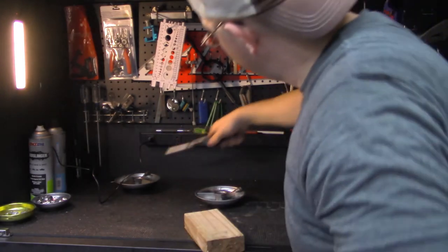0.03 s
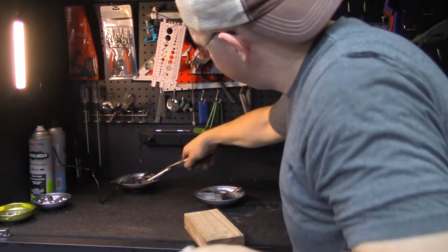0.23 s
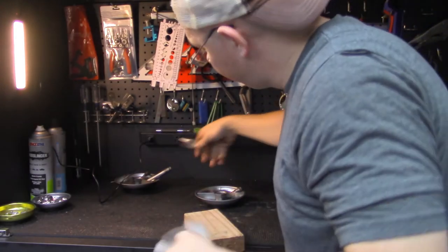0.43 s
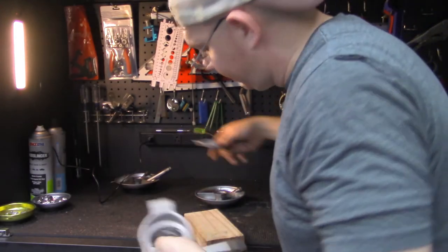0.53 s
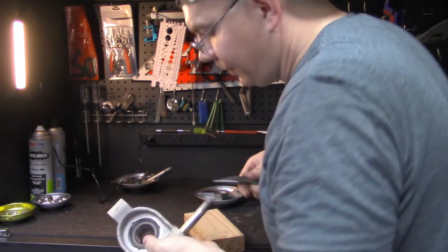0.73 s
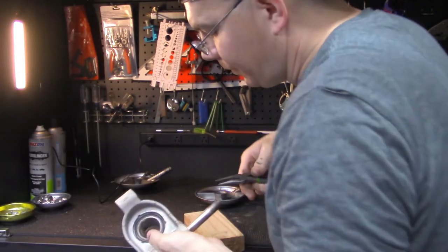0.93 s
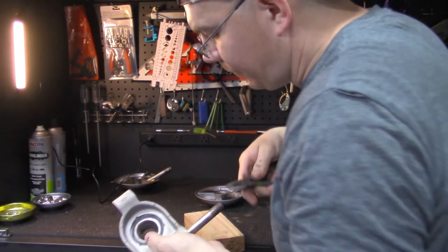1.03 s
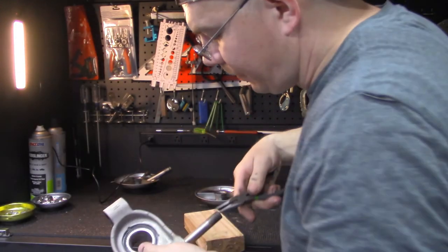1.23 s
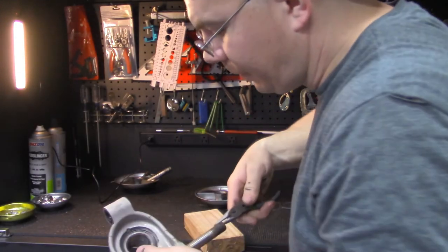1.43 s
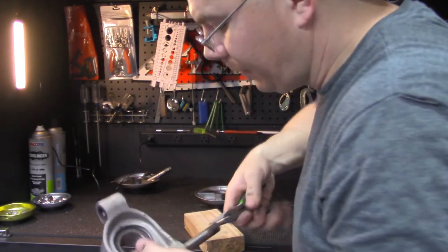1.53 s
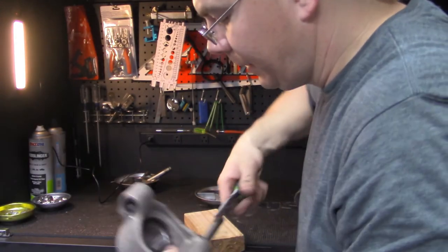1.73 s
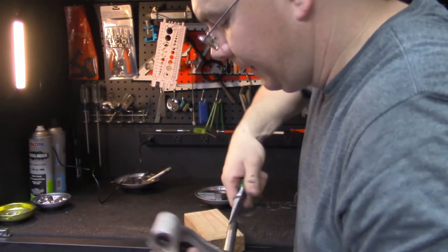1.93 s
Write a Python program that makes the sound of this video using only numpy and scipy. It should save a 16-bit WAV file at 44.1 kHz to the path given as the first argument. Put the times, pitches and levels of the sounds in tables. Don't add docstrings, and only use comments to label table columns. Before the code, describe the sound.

A steel tool drops into a metal dish with a loud clank, bounces and rattles the small parts, then a click, a soft thud and light tool clicks and scrapes, close stereo in a small humming garage.

```python
import sys
import numpy as np
from scipy import signal
from scipy.fft import rfft, irfft
from scipy.io import wavfile
from scipy.ndimage import uniform_filter1d

SR = 44100
rng = np.random.default_rng(int(sys.argv[2]) if len(sys.argv) > 2 else 0)


def digitize_waveform(pressure):
    field = np.atleast_2d(pressure).T
    bounded = np.clip(field, -1, 1)
    quanta = np.round(bounded * 32767).astype(np.int16)
    wavfile.write(sys.argv[1], SR, quanta)


def volts(x):
    e = np.asarray(x, float) / 20
    return 10 ** e


N = 88200
T = np.arange(N) / SR
HZ = np.fft.rfftfreq(N, 1 / SR) + 1

# frequency in Hz, level in dB.
AIR_SPECTRUM = [(15, -33.5), (25, 3), (134, -8.5), (301, -14), (775, -14), (1520, -25), (8000, -37.5),
                (16000, -41.5)]
# frequency in Hz, correlation from -1 to 1.
AIR_CORRELATION = [(60, 0.9), (130, 0.18), (290, 0.0087), (640, -0.29), (1410, 0.18), (3100, 0.55),
                   (6820, 0.24), (15000, -0.6)]
# time in seconds, level in dB.
RUMBLE_LEVEL = [(0.0, -51.5), (0.31, -40), (0.52, -46.5), (0.75, -45), (0.82, -35.5), (1.14, -42.5),
                (1.25, -42.5), (1.27, -50), (1.7, -51), (1.72, -55), (1.93, -44), (2.0, -52.5)]
# time in seconds, level in dB.
RUSTLE_LEVEL = [
    (0, -70),
    (.5, -52),
    (.8, -52),
    (1.2, -55),
    (1.55, -51.5),
    (1.7, -50),
    (2.0, -60),
]
# frequency in Hz, level in dB.
CLOTH_SPECTRUM = [(150, 17), (500, -39), (1200, 1.5), (2500, -7), (5000, -4), (9000, -9.5), (15000, -21.5)]
# start in seconds, length in seconds, level in dB, centre frequency in Hz.
SLIDES = [(1.322, .09, -46, 2400), (1.335, .075, -49, 920), (1.325, .07, -47, 6500), (1.59, .1, -54, 4500),
          (1.61, .08, -55, 7000), (1.62, .45, -58, 1500), (1.8, .25, -60, 750), (.7, .65, -66, 4600),
          (.85, .45, -63, 1150), (.243, .06, -27, 1250), (.245, .11, -27, 630), (.27, .15, -40, 215),
          (.52, .05, -47, 2200), (.52, .06, -45, 5200), (1.93, .07, -62, 4800)]
# start in seconds, level in dB, low mode in Hz, high mode in Hz,
# low mode against high mode in dB.
CONTACTS = [(.5203, -14, 3000, 4900, -3), (.5209, -14, 3900, 6900, -1), (.5206, -21, 2100, 5700, 0),
            (.5234, -22, 4900, 5900, 0), (.5290, -25, 3000, 5500, -4), (.5330, -26, 5000, 6200, 0),
            (.5430, -29, 4700, 5200, 0), (1.3228, -36, 2340, 6000, 5), (1.3275, -21, 2720, 6900, -1),
            (1.3360, -21, 2400, 6830, -1), (1.3430, -31, 2600, 7000, 3), (1.3510, -31, 2600, 6640, 2),
            (1.3597, -17, 4900, 6900, -3), (1.3600, -27, 2700, 5800, 2), (1.3660, -26, 2960, 7000, 0),
            (1.3772, -31, 2824, 7000, 6), (1.3864, -15, 2130, 5530, -4), (1.3915, -30, 2200, 5370, 4),
            (1.4697, -12, 4194, 6050, -8), (1.4760, -24, 4500, 5600, -2), (1.4700, -30, 2240, 9500, 3),
            (1.4943, -27, 2330, 5400, 0), (1.5010, -34, 4410, 5620, 0), (1.5808, -24, 4300, 6350, 0),
            (1.5870, -35, 3900, 5600, 0)]
# frequency in Hz, level in dB.
TICK_SPECTRUM = [(500, -38.5), (1200, -20.5), (2000, -3.5), (4000, -2.5), (6500, 5.5), (8000, -13),
                 (11000, -18), (16000, -23.5)]
# start in seconds, level in dB, crack in dB, dish ring in dB.
BLOWS_ON_DISH = [
    (.2305, 0.5, -1, -13),
    (.2330, -5.5, 4.5, -13),
    (.3266, -8.5, 1, 6),
    (.3340, -20, 1, -7),
    (.3385, -18, 8, 1),
]
# frequency in Hz, level in dB, T60 in seconds.
DISH_MODES = [(689, -10, .35), (650, -9, .3), (707, -9, .3), (1160, -14, .45), (1622, -11, .5),
              (1325, -11, .25), (3280, -5, .3), (5120, -11, .3), (5922, -10, .25), (6200, -9, .25),
              (7014, -13, .25), (7500, -11, .4), (8430, -15, .25), (242, -10, .25)]
# frequency in Hz, level in dB, T60 in seconds.
BLADE_MODES = [(2169, 5, 0.16), (2290, -4, 0.16), (5985, 3.5, 0.049), (6050, -11, 0.036), (6350, -3, 0.017),
               (6940, 0.5, 0.075), (5220, -11.5, 0.065), (1175, -5.5, 0.083), (1354, -9.5, 0.071),
               (7350, 0, 0.055), (8860, -1, 0.052), (3800, -5, 0.046)]
# frequency in Hz, level in dB.
CRACK_SPECTRUM = [(100, -54), (700, -18), (1200, -13), (2200, -8), (4000, -1.5), (6500, 2.5), (9000, -1),
                  (16000, -31.5)]
# frequency in Hz, level in dB.
PARTS_SPECTRUM = [(100, -29), (240, -4), (500, -22), (650, -19.5), (959, -9), (1300, 0), (1840, -9),
                  (7500, -7.5), (10600, -19)]
# time in seconds, level in dB.
SHAKE_LEVEL = [
    (.232, -27.5),
    (.25, -21),
    (.29, -19),
    (.322, -25),
    (.34, -29),
    (.37, -29),
    (.42, -47),
    (.5, -73),
]
# frequency in Hz, level in dB, T60 in seconds.
RIM_MODES = [(4929, 0, .7), (4912, -7, .6), (4893, -9, .6), (4962, -8, .3), (4832, -13, .6), (3280, -8, .3),
             (1622, -9, .45), (665, -7, .45), (615, -9, .25)]
# start in seconds, level in dB.
RIM_STRIKES = [
    (.2305, -44),
    (.290, -39),
    (.3375, -37),
    (.5205, -53),
]
# frequency in Hz, level in dB, T60 in seconds.
FLAT_MODES = [(2191, 0, .08), (2141, -6, .08), (3830, -3, .05), (4990, -3, .04), (5060, -5, .05),
              (6160, -3, .05), (6360, -4, .04), (7300, -7, .03), (8790, -7, .04), (1320, -8, .06)]
# start in seconds, level in dB.
FLAT_LANDINGS = [
    (.3266, -26),
    (.3284, -24),
    (.3340, -27),
    (.3380, -24),
]
# frequency in Hz, level difference in dB.
STEEL_LEFT_DB = [(60, 3.5), (110, 3.5), (200, 7.8), (380, 5.8), (700, 8.4), (1290, 10.7), (2380, 11),
                 (4400, 4.4), (8120, 4.8), (15000, 0.5)]
# frequency in Hz, phase in radians.
STEEL_LEFT_RAD = [(60, .2), (300, 1.0), (1200, .6), (5500, .6), (8000, -1.4), (11000, -3.0), (16000, -3.3)]
# frequency in Hz, level difference in dB.
AIR_LEFT_MINUS_RIGHT = [(60, 4.4), (110, 3.8), (200, 1.94), (380, 5.9), (700, 27), (1290, 4.4), (2380, 6.2),
                        (4400, 4.0), (8120, 2.0), (15000, 1.5)]


def across(table):
    hz, value = np.array(table).T
    return np.interp(np.log(HZ), np.log(hz), value)


def along(table):
    return volts(np.interp(T, *np.array(table).T))


def unit(x):
    return x / np.sqrt(np.mean(x ** 2))


def colour(x, table):
    cepstrum = irfft(np.log(volts(across(table))), N)
    cepstrum[1:N // 2] *= 2
    cepstrum[N // 2 + 1:] = 0
    return irfft(rfft(x) * np.exp(rfft(cepstrum)), N)


def cut(x, hz, kind, order=4):
    return signal.sosfilt(signal.butter(order, hz, kind, fs=SR, output="sos"), x)


def ring(x, modes):
    out = 0
    for hz, db, t60 in modes:
        decay = np.log(1000) / max(t60, .002)
        pole = np.exp((2j * np.pi * hz - decay) / SR)
        out = out + volts(db) * signal.lfilter([1], [1, -pole], x).imag
    return out


def at(s, db=0):
    x = np.zeros(N)
    x[int(s * SR)] = volts(db)
    return x


def fade(s, t60):
    return (T >= s) * volts(-60 * np.clip(T - s, 0, None) / t60)


def walk(rate):
    k = int(SR / rate)
    steps = np.repeat(rng.standard_normal(N // k + 1), k)
    return unit(uniform_filter1d(uniform_filter1d(steps, k), k)[:N])


def grains(rate, spread_db):
    happens = rng.random(N) < rate / SR
    size = volts(spread_db * np.minimum(rng.exponential(size=N), 4))
    return unit(happens * size * rng.choice([-1, 1], N))


def wide(table):
    like = np.clip(across(AIR_CORRELATION), -.98, .98)
    noise = rfft(rng.standard_normal((2, N))) * volts(across(table))
    mid, side = noise * np.sqrt([1 + like, 1 - like])
    return unit(irfft(np.array([mid + side, mid - side]), N))


def garage_air():
    return volts(-46.5 + 0.23 * walk(3.35)) * wide(AIR_SPECTRUM)


def sleeve_rustle():
    return along(RUSTLE_LEVEL) * volts(1.2 * walk(8.2)) * wide(CLOTH_SPECTRUM)


def bench_rumble():
    centre_hz, width_hz = 53.4, 48
    hump = [(15, -20), (centre_hz - width_hz / 3, 0), (centre_hz + width_hz, -7), (260, -30), (600, -70)]
    return along(RUMBLE_LEVEL) * wide(hump)


def casting_thud():
    hz, t60_s = 231.4, 0.11
    force = uniform_filter1d(at(.785, -40.5), size=60)
    return ring(force, [(hz, 0, t60_s), (0.85 * hz, 0, t60_s)])


def room(x):
    gap_s, t60_low_s, t60_high_s = 0.001, 0.34, 0.29
    noise = rng.standard_normal((2, N))
    low = cut(noise, 3000, "low", order=2 - 1)
    tail = low * fade(gap_s, t60_low_s) + (noise - low) * fade(gap_s, t60_high_s)
    tail = tail / np.sqrt(np.sum(tail ** 2) / 2)
    return volts(-6.5) * signal.fftconvolve(x[None], tail, axes=1)[:, :N]


def scrapes():
    out = 0
    for s, length, db, hz in SLIDES:
        progress = np.clip((T - s) / length, 0, 1)
        pressure = np.sin(np.pi * progress ** .6) ** .7
        rub = ring(grains(9000, 2.5), [(hz, 0, 18 / hz), (hz * 1.13, -2, 18 / hz)])
        out = out + volts(db + 1) * pressure * unit(rub)
    return out


def clicks():
    ring_t60_s, spread = .0055, .1
    tick_t60_s, chatter_t60_s = 0.0033, 0.05
    rings, ticks = 0, 0
    for s, db, low_hz, high_hz, low_db in CONTACTS:
        low_shift, high_shift = 1 + spread * rng.standard_normal(2)
        modes = [(low_hz, low_db, 2.2 * ring_t60_s), (low_hz * low_shift, low_db - 2.5, ring_t60_s),
                 (high_hz, 0, ring_t60_s), (high_hz * high_shift, -3, ring_t60_s)]
        rings = rings + ring(uniform_filter1d(at(s, db - 8.5), size=3), modes)
        ticks = ticks + volts(db - 13) * fade(s, tick_t60_s)
        ticks = ticks + volts(db - 23.5) * fade(s, chatter_t60_s)
    return rings + ticks * unit(colour(rng.standard_normal(N), TICK_SPECTRUM))


def shaken_parts():
    shake = grains(4000, 2.8)
    start_s, end_s = SHAKE_LEVEL[0][0], SHAKE_LEVEL[-1][0]
    held = along(SHAKE_LEVEL) * (T > start_s) * (T < end_s)
    out = held * unit(colour(shake, PARTS_SPECTRUM))
    for modes, db in [(DISH_MODES, -5.5), (BLADE_MODES, -10)]:
        steady = np.std(ring(shake, modes))
        out = out + volts(db) * ring(shake * held, modes) / steady
    return out


def tool_drop():
    out, hiss = 0, unit(colour(rng.standard_normal(N), CRACK_SPECTRUM))
    for s, db, crack_db, dish_db in BLOWS_ON_DISH:
        out = out + ring(at(s, db + dish_db - 34.5), DISH_MODES)
        out = out + ring(at(s, db - 19.5), BLADE_MODES)
        out = out + volts(db + crack_db - 6.5) * hiss * fade(s, 0.031)
    out = out + ring(sum(at(*hit) for hit in RIM_STRIKES), RIM_MODES)
    return out + ring(sum(at(*hit) for hit in FLAT_LANDINGS), FLAT_MODES)


def microphones(x, table, rad=0):
    half = volts(across(table) / 2) * np.exp(.5j * rad)
    power = np.abs(half) ** 2 + 1 / np.abs(half) ** 2
    return irfft(rfft(x) * np.array([half, 1 / half]) / np.sqrt(power) * 1.566, N)


def scene():
    background = garage_air() + sleeve_rustle() + bench_rumble() + casting_thud()
    dish = cut(tool_drop() + shaken_parts(), 384, "high", order=1)
    steel = dish + cut(clicks(), 1690, "high") + scrapes()
    direct = microphones(steel, STEEL_LEFT_DB, across(STEEL_LEFT_RAD))
    reverberant = microphones(room(steel), STEEL_LEFT_DB)
    return direct + reverberant + microphones(background, AIR_LEFT_MINUS_RIGHT)


def band_limit(x):
    return signal.sosfilt(signal.butter(12, 16250, fs=SR, output="sos"), x)


def record(dry):
    top_hz, starved_hz, threshold_db = 16250, 10600, -28
    late, span = int(.010 * SR), int(.11 * SR)
    x = 1.1 * np.tanh(dry / 1.1)
    x = irfft(rfft(x) * (HZ < top_hz), N)
    top = irfft(rfft(x) * (HZ > starved_hz), N)
    memory = np.r_[np.zeros(late), np.ones(span) / span]
    spent = signal.fftconvolve(cut(x[0], 1500, "high") ** 2, memory)[:N]
    shut = uniform_filter1d(1. * (spent > volts(2 * threshold_db)), size=200)
    return band_limit(x - top * shut)


dry = scene()
out = record(dry)
digitize_waveform(out)
```